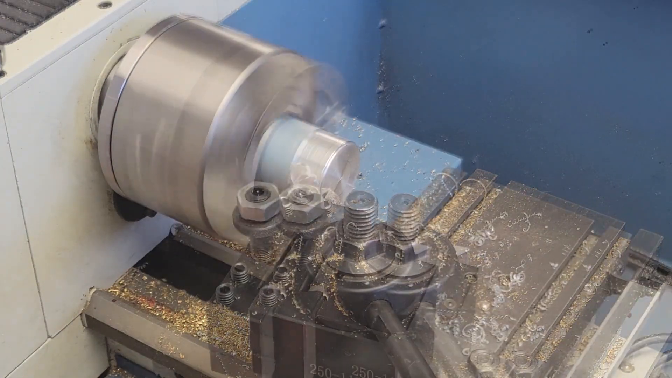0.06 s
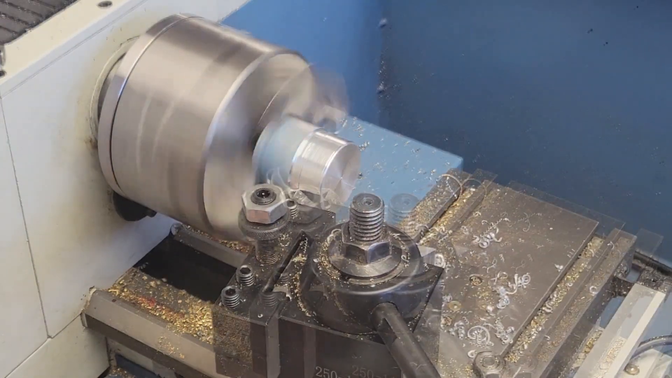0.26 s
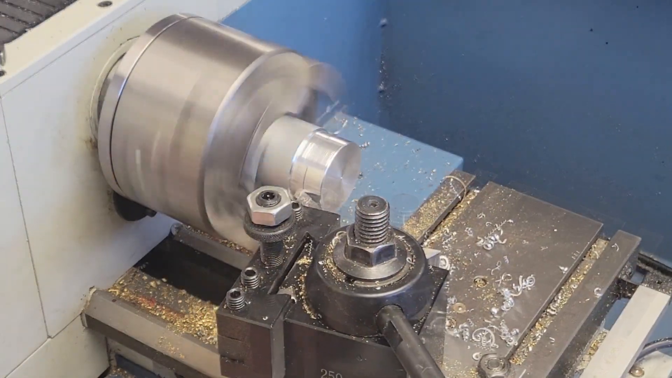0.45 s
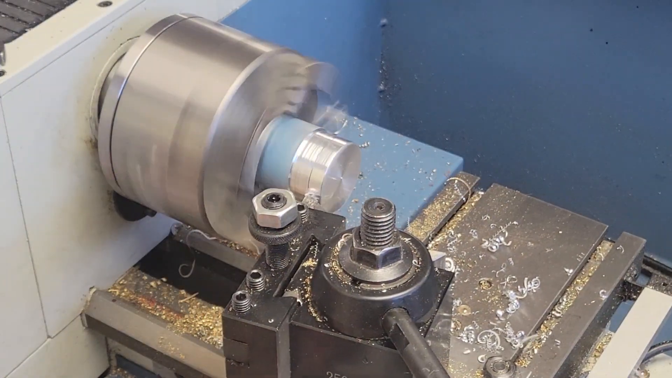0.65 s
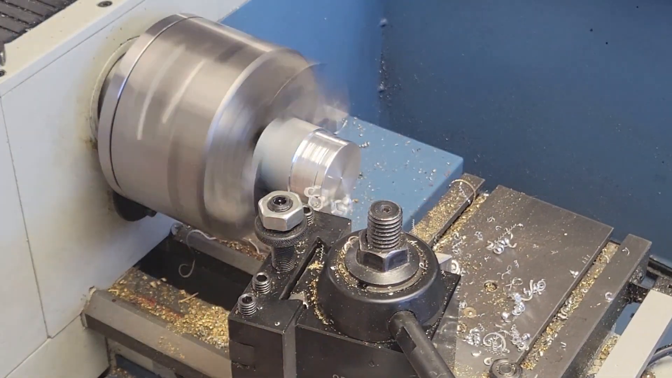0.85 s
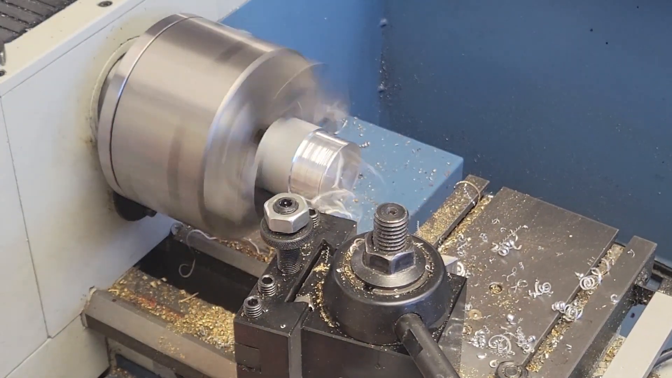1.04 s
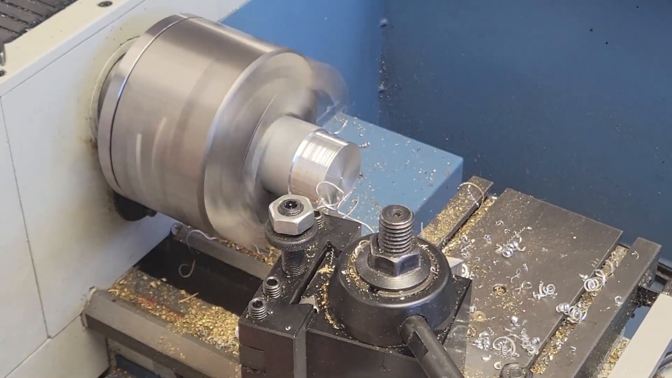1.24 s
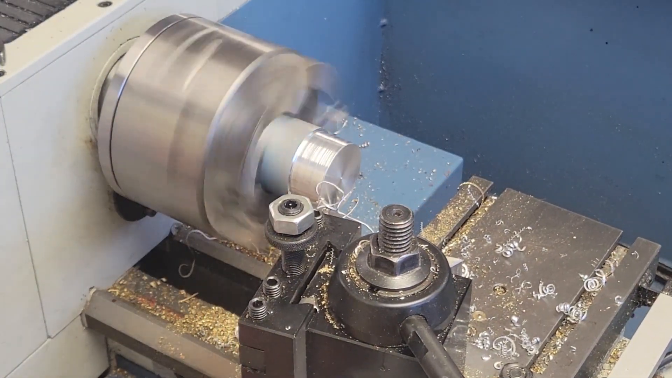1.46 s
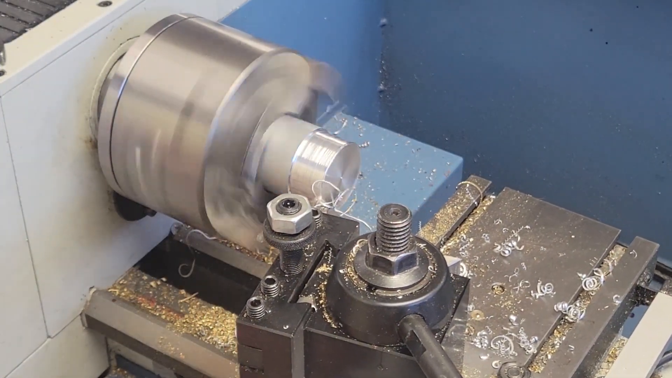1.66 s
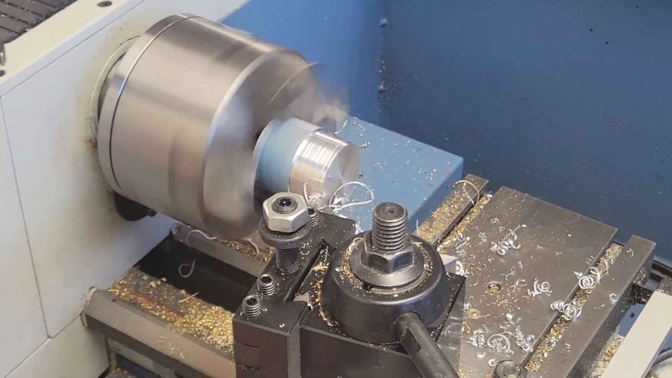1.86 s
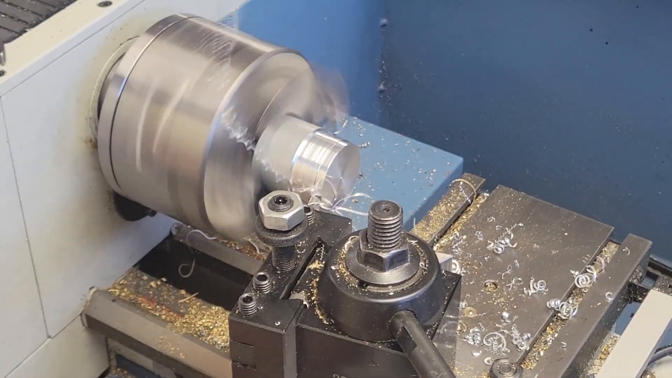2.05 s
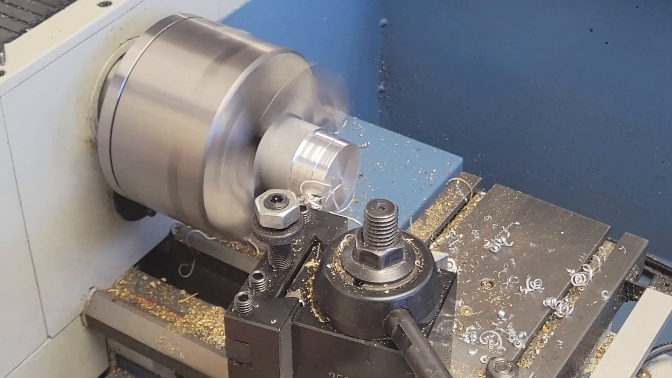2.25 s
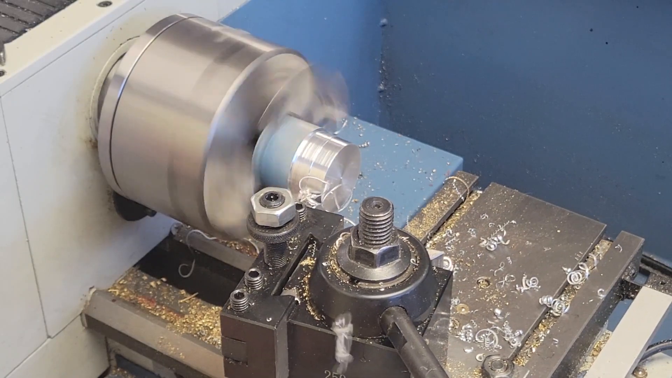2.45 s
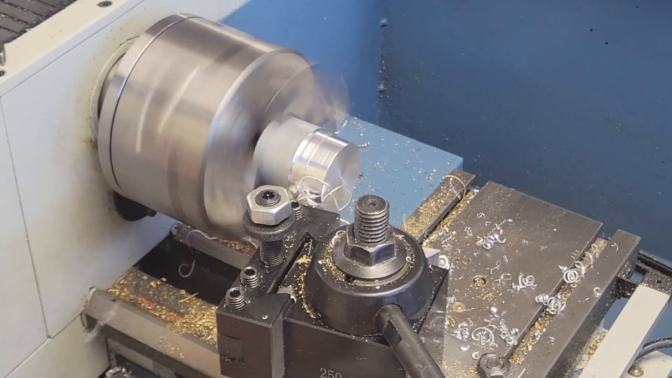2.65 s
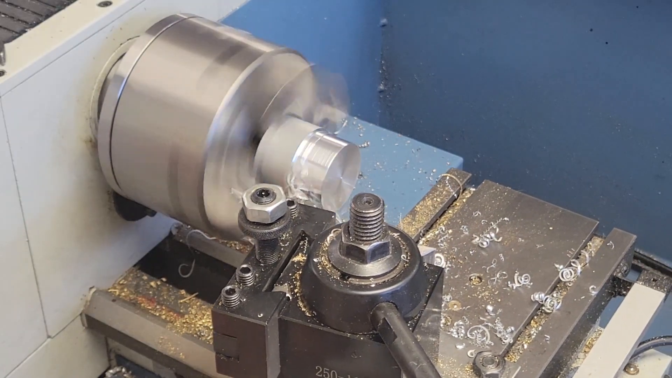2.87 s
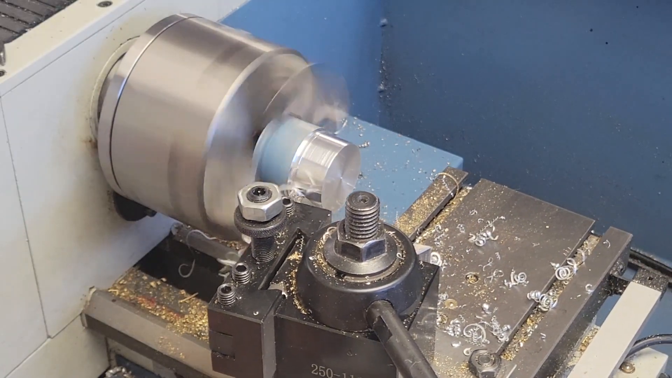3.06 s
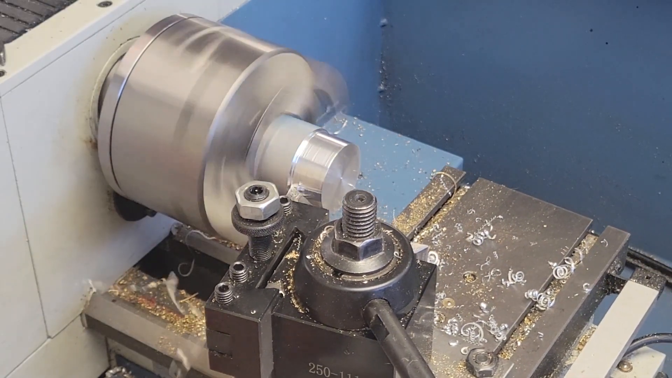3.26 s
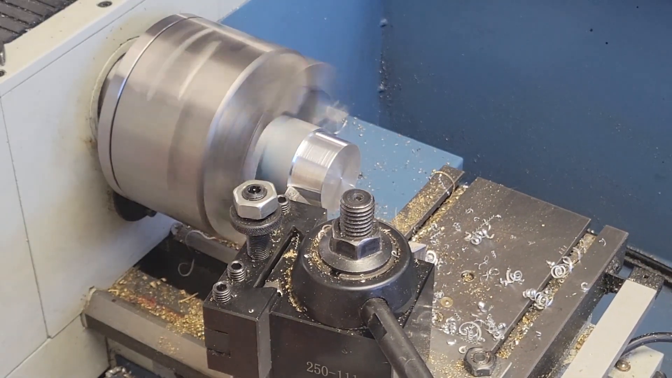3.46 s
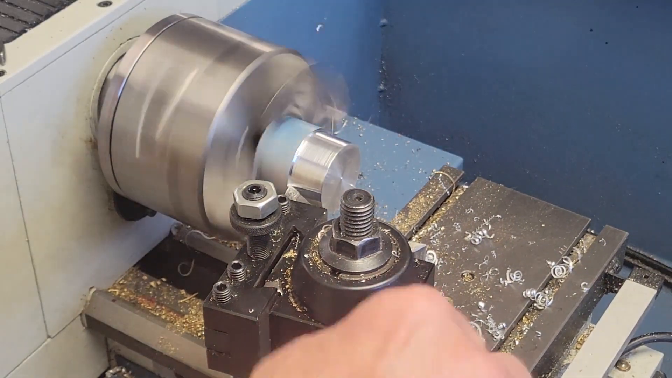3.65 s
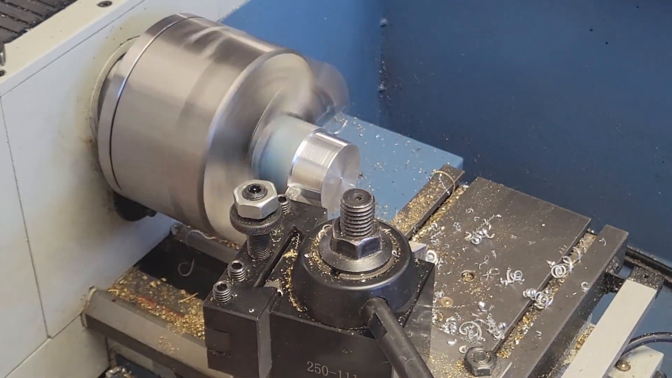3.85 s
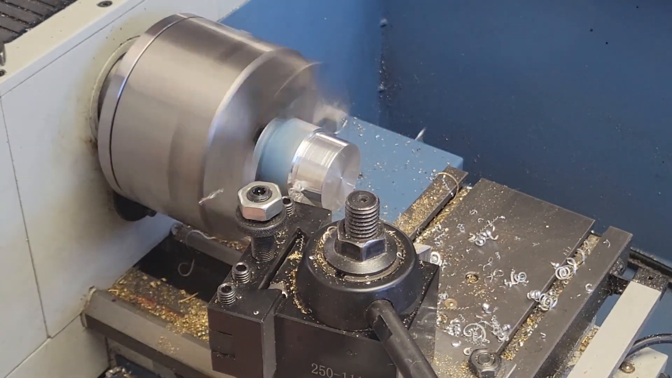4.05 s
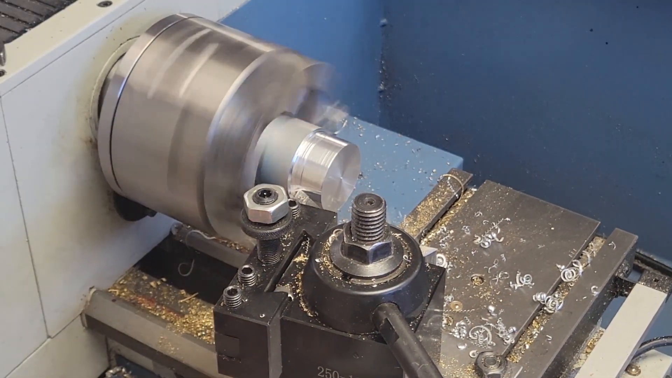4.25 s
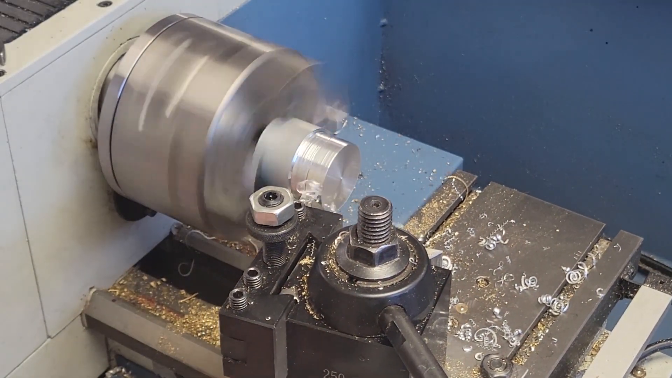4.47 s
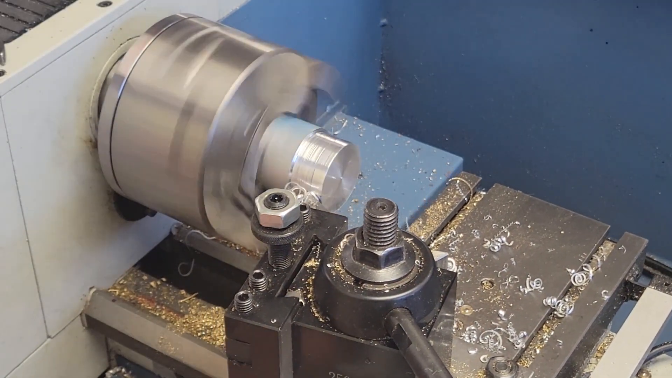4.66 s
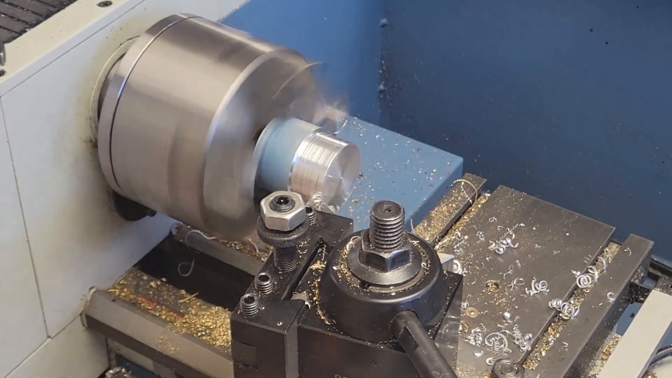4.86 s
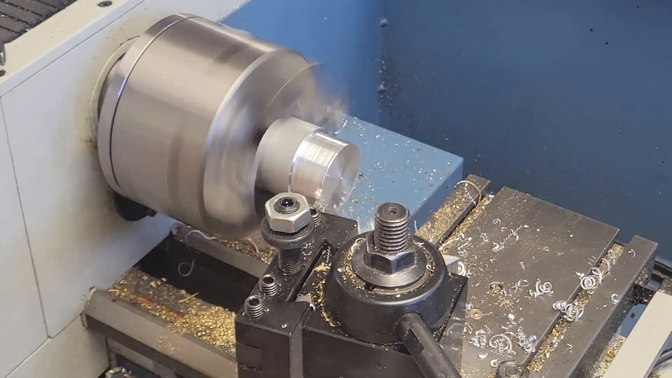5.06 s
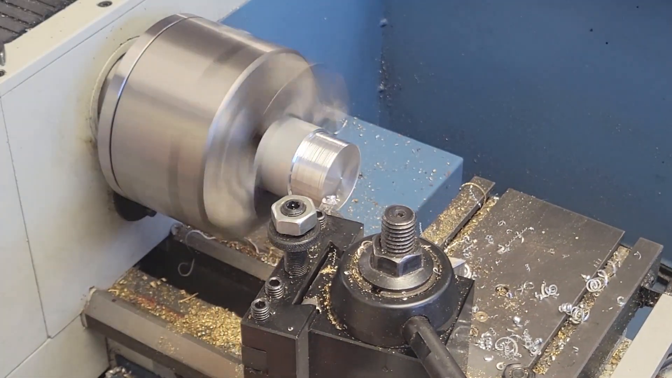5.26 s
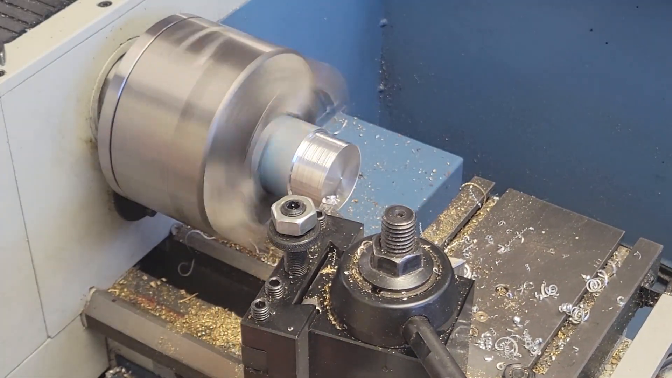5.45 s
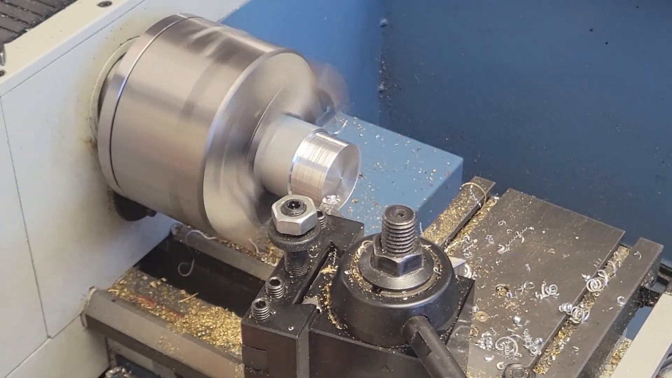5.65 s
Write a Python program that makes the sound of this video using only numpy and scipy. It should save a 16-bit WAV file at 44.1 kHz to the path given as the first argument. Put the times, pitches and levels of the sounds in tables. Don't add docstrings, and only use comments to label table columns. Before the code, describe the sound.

Close, gritty lathe cutting: wavering gear whine, fluttering bright chip hiss, rough knocking under load, and quick metallic ticking whenever the tool lets go.

```python
import sys
import numpy as np
from scipy import signal
from scipy.fft import rfft, irfft, next_fast_len
from scipy.io import wavfile

SR = 44100
rng = np.random.default_rng(int(sys.argv[2]) if len(sys.argv) > 2 else 0)


def magnitude_from_level(level_db):
    exponent = np.asarray(level_db, float) / 20
    return 10 ** exponent


def dump(signal):
    limited = np.clip(np.atleast_2d(signal).T, -1, 1)
    pcm = np.round(limited * 32767).astype(np.int16)
    wavfile.write(sys.argv[1], SR, pcm)


N = 251811
TIME_S = np.arange(N) / SR
TEETH = 32
SPINDLE_RATIO = 8
MEAN_LOAD_DB = -51.5


def rms_one(x):
    return x / np.sqrt(np.mean(x ** 2) + 1e-20)


def in_time(rows):
    s, *columns = np.transpose(rows)
    return [np.interp(TIME_S, s, column) for column in columns]


def at_hz(points, hz):
    table_hz, table_db = np.transpose(points)
    return np.interp(np.log(hz), np.log(table_hz), table_db)


def drift(rate):
    r = np.exp(-32 * np.pi * rate / SR)
    slow = signal.lfilter([1], [1, -2 * r, r * r], rng.standard_normal(N // 16 + 2002))
    slow = slow[2000:]
    return np.interp(np.arange(N) / 16, np.arange(len(slow)), rms_one(slow))


def bump(centre_s, width_s):
    return np.exp(-((TIME_S - centre_s) / width_s) ** 2 / 2)


def spell(start_s, end_s):
    return np.clip(np.minimum(TIME_S - start_s, end_s - TIME_S) / 0.008 + .5, 0, 1)


def resonance(hz, centre, width):
    return 1j * hz * width / (centre ** 2 - hz ** 2 + 1j * hz * width)


def casting(hz):
    # [f/Hz, width/Hz, lift/dB]
    ringing_modes = [(332.7, 34, 11.5), (465.6, 33, 10), (943, 37, 11), (1140, 22, 4.5), (1410, 50, 7),
                     (1623, 49, 7), (1772, 47, 8), (1970, 38, 5.5), (2622, 75, 5), (3806, 34, 10),
                     (4145, 69, 8.5), (4320, 29, 7.5), (4537, 46, 6), (4700, 100, 4.5), (5130, 40, 3.5),
                     (5420, 99, 2.5), (6000, 60, 1), (6215, 44, 8.5), (6740, 78, 9.5), (7440, 40, 6),
                     (7880, 64, 13), (8370, 130, 8), (8990, 55, 7), (10000, 330, 0.5), (10800, 30, -1),
                     (13200, 170, 6), (14200, 60, 8.5), (15080, 80, 7), (15420, 60, 8)]
    # [f/Hz, width/Hz, level/dB]
    cancelled = [(549, 34, -7), (2240, 230, -5), (3660, 110, 1), (4266, 55, -8.5), (4540, 40, -11.5),
                 (5050, 99, -11), (5296, 130, -6.5), (7640, 150, -2.5), (8010, 120, -14), (14500, 180, -4)]
    grid = np.arange(1, SR / 2, 4)
    gain = np.ones(len(grid), complex)
    for centre, width, db in [*ringing_modes, *cancelled]:
        gain = gain * (1 + (magnitude_from_level(db) - 1) * resonance(grid, centre, width))
    return np.interp(hz, grid, gain)


def placed(pair, response=lambda hz: 1, lift=lambda hz: 1):
    # [delay/s, level/dB]
    bench_echoes = [(.00022, 0), (.0009, -1.5), (.0021, -2.5), (.0034, -3)]
    # [f/Hz, level/dB]
    side_levels = [(60, -4), (110, -14), (200, -10), (380, -13.5), (700, -11.5), (1290, -16.5), (2380, -8),
                   (4400, -5.5), (8120, -3), (15000, -3)]
    # [f/Hz, level/dB]
    left_levels = [(60, 0), (200, -3), (480, -3.5), (1000, -1.5), (2000, -0.5), (4000, -3.5), (8000, -0.5),
                   (15000, -1)]
    echo_share, right_lag_s = .66, 1.2e-5
    size = next_fast_len(N + 4096)
    hz = np.maximum(np.arange(size // 2 + 1) * SR / size, 1)
    mid, diffuse = rfft(pair, size) * response(hz)
    mid = mid * lift(hz)
    echo = sum(magnitude_from_level(db) * np.exp(-2j * np.pi * hz * s) for s, db in bench_echoes)
    echo = mid * echo / (np.abs(echo) + 1e-9)
    side = echo_share * echo + np.sqrt(1 - echo_share ** 2) * diffuse
    side = side * magnitude_from_level(at_hz(side_levels, hz))
    lean = magnitude_from_level(at_hz(left_levels, hz) / 2) * np.exp(1j * np.pi * hz * right_lag_s)
    return irfft(np.array([(mid + side) * lean, (mid - side) / lean]), size)[:, :N]


def through_casting(force, spectrum):
    return rms_one(placed(force, lambda hz: magnitude_from_level(at_hz(spectrum, hz)), casting))


def gritty(per_s, spread_db, grit):
    hit = rng.random(N) < per_s / SR
    size = hit * magnitude_from_level(spread_db * np.minimum(rng.exponential(1, N), 4))
    burst = signal.lfilter([1], [1, -.985], size)
    return rng.standard_normal((2, N)) * (1 + grit * burst)


def throb(turns, motor_db, spindle_db, sharp):
    motor = np.exp(sharp * (np.cos(2 * np.pi * (turns - .15)) - 1))
    spindle = np.cos(2 * np.pi * (turns / SPINDLE_RATIO - .35))
    return magnitude_from_level(motor_db * motor + spindle_db * spindle)


def motor_state():
    # [t/s, f/Hz, level/dB]
    speed = [(0, 1293, -67), (.33, 1362, -62.5), (1.1, 1371, -57), (1.62, 1369, -70), (1.69, 1264, -62),
             (1.78, 1253, -56.5), (1.88, 1278, -53), (2.02, 1373, -56.5), (2.5, 1356, -55.5),
             (3.2, 1356, -58.5), (3.81, 1387, -55), (3.88, 1251, -57.5), (4.07, 1336, -58),
             (4.64, 1392, -59), (4.68, 1280, -54.5), (4.88, 1339, -57), (5.0, 1399, -67), (5.71, 1345, -57)]
    # [t/s, load level/dB, chip flow level/dB]
    cutting = [(0, -63, -58.5), (.33, -63, -57), (.45, -57, -53), (1.22, -57, -52), (1.46, -55, -50),
               (1.75, -52.5, -50), (2.3, -47.5, -49), (3.1, -49, -49.5), (3.3, -55.5, -53), (3.8, -54, -52),
               (3.9, -58.5, -54), (4.05, -59, -52), (4.45, -56, -52), (4.63, -58, -53.5), (4.8, -50, -52.5),
               (5.0, -57.5, -53), (5.3, -59, -53.5), (5.71, -61.5, -52.5)]
    # [from t/s, to t/s, top speed t/s, speed gain/Hz, whine change/dB]
    slack_spells = [
        (1.236, 1.457, 1.22, 110, -11),
        (3.292, 3.387, 3.3, 104.7, -3.5),
        (3.463, 3.845, 3.5, 80.2, -6.5),
        (5.208, 5.8, 5.26, 104.5, -8),
    ]
    # [t/s, knock/dB, roar/dB, sag/Hz]
    bites = [(0.277, 6.5, -1, 45.5), (0.539, 4, 3, 35), (.625, 0, 3.5, 0.5), (.75, -2, -1, 55),
             (.855, 0.5, -3, 35), (1.0, 2.5, -5, 24.5), (1.37, 4, -1, -0.5), (1.887, 11, 4, 15.5),
             (1.94, 4, -3, 0.5), (2.15, 7.5, -1, 39.5), (2.219, 6.5, -3, 24.5), (2.29, 8, -3, 43),
             (2.48, 7.5, -0.5, 10), (2.6, 6, 1.5, 30), (2.67, 6.5, 2, 5), (2.851, 2, 1.5, 5.5),
             (2.92, 4.5, 1.5, 24), (3.064, 7, -5, 30), (3.239, 3, 2.5, 2), (3.414, 11.5, 11, 44.5),
             (3.996, 3, 8, 35), (4.15, 7.5, 7.5, 9), (4.175, 3, -0.5, 49.5), (4.28, 4.5, 3, 5),
             (4.33, -3, -3.5, 35.5), (4.359, 7.5, 11, 5), (4.411, 8.5, 4.5, 41.5), (4.741, 5, -6, 10),
             (4.83, 4, -11, -2.5), (5.041, 2.5, 6, 50), (5.165, 0, 3, 20.5), (5.53, 12, 1, -1.5)]
    # [t/s, speed sag/Hz, whine swell/dB]
    wavers = [(.12, -2, 5), (.19, 20, 4.5), (.33, -16, 4), (.38, 16, 1), (.44, -10, 2), (.49, 30, -2),
              (.59, -35, 9), (.88, -9, 1), (.93, 17, 2), (.98, 5, -2), (1.14, -25, 3), (1.19, -15, 0),
              (1.73, -10, -1), (1.85, -10, 1.5), (1.98, -10, 3), (2.07, 22, .5), (2.15, 15, -5),
              (2.26, 15, -2), (2.33, -12, 1), (2.49, -9, 1.5), (2.63, -28, 2), (2.67, -4, 2.5),
              (2.72, -8, -3), (2.77, -22, 3), (3.08, 25, -3), (3.32, -23, 2), (3.37, 13, -1),
              (3.43, 25, -3), (3.85, 11, 0), (3.97, -4, -1), (4.03, -1, 4.5), (4.14, 35, -3),
              (4.21, -12, 1), (4.26, 28, 0.5), (4.42, 13, -1.5), (4.52, 11, 2.5), (4.6, 1, -1.5),
              (4.65, 25, -3), (4.72, -30, 4), (4.84, -13, 0), (4.95, 8, 3), (5.04, -10, 3.5)]
    # [from t/s, to t/s, knock/dB]
    lulls = [
        (1.501, 1.641, -2),
        (1.7, 1.865, -4),
    ]
    # [t/s, half length/s, level/dB]
    dropouts = [(.52, .012, -1), (.59, 0.011, -12), (0.823, 0.0074, -5), (1.115, .01, -16),
                (2.648, 0.016, -6), (2.757, .02, -5), (2.98, .012, 1), (3.128, 0.03, -3), (3.27, .01, -11),
                (3.33, .012, -2), (3.56, 0.035, -10), (3.72, .05, -1), (3.965, 0.012, -5),
                (4.37, 0.011, -2), (4.63, 0.024, 1.5)]
    race_rise_s, race_fall_hz_per_s = .08, 420
    sag_s, mesh_db_per_sag_hz, mean_flow_db = .021, 0.0928, -52.5
    tooth_hz, mesh = in_time(speed)
    load_db, flow_db = in_time(cutting)
    slack, race, knock, roar, sag = np.zeros((5, N))
    for start, end, fastest_s, gain_hz, fade_db in slack_spells:
        loose = spell(start, end)
        slack += loose
        mesh = mesh + fade_db * loose
        rise = gain_hz * (1 + (TIME_S - fastest_s) / race_rise_s)
        fall = gain_hz - race_fall_hz_per_s * (TIME_S - fastest_s)
        ending = np.clip((end - TIME_S) / race_rise_s, 0, 1)
        race += np.clip(np.minimum(rise, fall), 0, None) * ending
    for s, knock_db, roar_db, sag_hz in bites:
        late = TIME_S - s + 0.0078
        jolt = np.exp(-(late / np.where(late < 0, 0.0092, 0.026)) ** 2 / 2)
        knock += knock_db * jolt
        roar += roar_db * jolt
        sag += sag_hz * bump(s, sag_s)
    mesh = mesh + mesh_db_per_sag_hz * sag
    for s, sag_hz, swell_db in wavers:
        swing = bump(s, sag_s)
        sag += sag_hz * swing
        mesh = mesh + (swell_db + mesh_db_per_sag_hz * sag_hz) * swing
    for s, half_s, change_db in dropouts:
        mesh = mesh + change_db * bump(s, half_s)
    knock += MEAN_LOAD_DB - 9 + 0.86 * (load_db - MEAN_LOAD_DB) - 13.5 * slack
    for start, end, lull_db in lulls:
        knock += lull_db * spell(start, end)
    roar += load_db - 2 * slack
    air = mean_flow_db - 4.5 + 0.46 * (flow_db - mean_flow_db) - 2 * slack
    return tooth_hz + race - sag, mesh, knock, roar, flow_db, air


def whine(cycles, level_db, blur, flutter_db):
    gain = np.sqrt(2) * magnitude_from_level(level_db + flutter_db * drift(13.0))
    return gain * np.array([np.sin(2 * np.pi * cycles + blur * drift(25)) for ear in range(2)])


def gears(turns, tooth_hz, second_db, load_db):
    # [t/s, level/dB]
    feed = [
        (1.45, -112),
        (1.48, -63.5),
        (1.64, -62.5),
        (1.7, -66),
        (1.9, -67),
        (1.98, -60),
        (3.24, -60),
        (3.28, -87),
    ]
    # [multiple, level/dB]
    feed_lines = [(1, -10), (2, 2.5), (3, 2)]
    # [multiple, level below the second/dB]
    gear_upper = [(4, -21)]
    # [t/s, level below the second/dB]
    whistle = [(0, -16), (.2, -11), (.8, -9), (1.1, -15), (1.72, -7), (1.95, -11), (2.1, -17), (3.6, -16),
               (3.85, -10), (4.85, -9.5), (5.1, -13)]
    # [t/s, level/dB]
    idler = [
        (0, -87),
        (5.19, -89),
        (5.23, -74),
        (5.42, -67),
        (5.71, -60.5),
    ]
    feed_teeth, idler_teeth = 15, 42
    teeth_passed = TEETH * turns
    near = np.abs(resonance(tooth_hz, 1400, 170))
    first_db = -61.5 + .5 * np.minimum(load_db - MEAN_LOAD_DB, 0)
    out = near * whine(teeth_passed, first_db, blur=.15, flutter_db=1.2)
    out += whine(2 * teeth_passed, second_db + 1.5, blur=.2, flutter_db=.4)
    near = np.abs(resonance(3 * tooth_hz, 4140, 160)) ** 2
    out += near * whine(3 * teeth_passed, second_db - 11.5, blur=0.34, flutter_db=4.5)
    near = np.abs(resonance(3 * tooth_hz, 3770, 260)) ** 2
    out += near * whine(3 * teeth_passed, second_db - 5, blur=1.2, flutter_db=1.5)
    near = np.abs(resonance(8 * tooth_hz, 10400, 1100)) ** 2
    whistle_db = second_db + in_time(whistle)[0] + 3 * drift(40)
    out += near * whine(8 * teeth_passed, whistle_db, blur=2.6, flutter_db=1.5)
    out += whine(idler_teeth * turns, in_time(idler)[0], blur=0.24, flutter_db=1.0)
    engaged = (TIME_S > feed[0][0]) & (TIME_S < feed[-1][0])
    feed_db = np.where(engaged, in_time(feed)[0], -120)
    for multiple, level_db in feed_lines:
        out += whine(multiple * feed_teeth * turns, feed_db + level_db, blur=.2, flutter_db=1.5)
    upper = np.zeros((2, N))
    for multiple, level_db in gear_upper:
        upper += whine(multiple * teeth_passed, second_db + level_db, blur=0.67, flutter_db=6.0)
    return placed(out) + placed(upper, lift=casting)


def gear_knock():
    # [f/Hz, level/dB]
    knock_colour = [(71, -79), (120, -47), (395, -18), (460, -11.5), (637, -5), (695, -14), (931, -7),
                    (1040, -3.5), (1600, -1.5), (2080, -22.5), (3520, -120)]
    return through_casting(gritty(250, spread_db=2.5, grit=.6), knock_colour)


def casting_roar(beat):
    # [f/Hz, level/dB]
    roar_colour = [(650, -46), (1100, -8), (1870, 9.5), (2330, 3), (2660, -6.5), (2780, -20), (2930, -23.5),
                   (3300, -6.5), (4290, -50), (7260, -120)]
    return through_casting(gritty(300, spread_db=2, grit=.3) * beat ** .5, roar_colour)


def tool_hiss(beat):
    # [f/Hz, level/dB]
    tool_colour = [(1350, -36), (2300, -23), (2640, -4), (3190, -8), (3760, -3), (4660, -3.5), (5130, -6.5),
                   (6130, -6), (7800, -18), (10100, -75), (17200, -120)]
    return through_casting(gritty(200, spread_db=2, grit=.25) * beat, tool_colour)


def chip_hiss(beat):
    # [f/Hz, level/dB]
    air_colour = [(4240, -40), (7200, -7), (7560, -14.5), (8080, -2.5), (8620, -1.5), (9490, -5),
                  (10500, -6.5), (12000, -19.5), (15600, -67), (22000, -120)]
    return through_casting(gritty(300, spread_db=1.5, grit=.2) * beat, air_colour)


def highest_hiss(beat):
    # [f/Hz, level/dB]
    top_colour = [(6880, -31), (11700, -21), (12200, -4), (13700, -2.5), (14500, 0), (15700, -6)]
    return through_casting(gritty(300, spread_db=1.5, grit=.2) * beat ** .7, top_colour)


def rattles():
    # [t/s, peak level/dB, ring f/Hz]
    tooth_knocks = [(1.1583, -54, 4520), (1.1784, -50, 4400), (1.2146, -46, 4480), (1.2361, -42, 4650),
                    (1.258, -40, 4630), (1.28, -42, 4520), (1.3019, -42, 4480), (1.3236, -45, 4530),
                    (1.3452, -49, 4500), (1.3663, -50, 4630), (3.2615, -47, 4450), (3.5534, -48, 4380),
                    (5.1726, -50, 4535), (5.2064, -46, 4730), (5.229, -44, 4650), (5.249, -43, 4630),
                    (5.2709, -40.5, 4580), (5.2929, -46, 4340), (5.3134, -46, 4730), (5.333, -46, 4430),
                    (5.3574, -48, 4300), (5.3817, -50, 4876), (5.4001, -53, 4410), (5.4257, -46, 4410),
                    (5.45, -48, 4740), (5.496, -51, 4670), (5.5174, -44, 4730), (5.5773, -48, 4640)]
    rise_s, upper_hz, upper_db = 0.0014, 280, -10
    out = np.zeros((2, N + SR))
    t = np.arange(600) / SR
    shape = t / rise_s * np.exp(1 - t / rise_s)
    for s, db, hz in tooth_knocks:
        low_phase, high_phase = rng.uniform(0, 2 * np.pi, (2, 2, 1))
        ring = np.sin(2 * np.pi * hz * t + low_phase)
        ring = ring + magnitude_from_level(upper_db) * np.sin(2 * np.pi * (hz + upper_hz) * t + high_phase)
        start = int(s * SR)
        out[:, start:start + len(t)] += magnitude_from_level(db - 1) * shape * ring
    return placed(out[:, :N])


def scrapes_and_blows():
    # [t/s, level/dB, ring f/Hz, width/Hz, length/s]
    band_bursts = [(3.42, -63, 4330, 50, .25), (1.19, -62, 4350, 50, .12), (3.5, -67, 5760, 60, .14),
                   (3.46, -62, 2550, 60, .12), (3.595, -49.5, 2620, 280, .065),
                   (3.625, -54, 2350, 120, .035), (3.76, -51, 2200, 600, .065), (3.945, -53, 1430, 60, .055),
                   (3.94, -60, 2950, 150, .02), (3.97, -59, 2900, 150, .015), (4.13, -57, 2990, 150, .015),
                   (4.16, -54, 3020, 150, .018), (4.125, -56, 1500, 200, .045),
                   (4.685, -54, 3050, 150, .015), (1.68, -55, 1410, 80, .04), (.515, -60, 1850, 300, .04),
                   (1.62, -58, 3755, 80, .12), (1.74, -54, 3760, 60, .09), (1.84, -54, 3780, 60, .09),
                   (1.66, -57, 1390, 90, .2), (1.68, -55, 1775, 70, .24), (1.98, -58, 3700, 260, 1.25),
                   (3.235, -77, 260, 120, .025), (3.985, -53, 1700, 900, .012),
                   (4.145, -54, 1600, 700, .014), (5.03, -53, 1800, 800, .014), (4.27, -60, 3020, 120, .03),
                   (3.9, -65.5, 1388, 22.8, 0.55), (4.9, -68, 1405, 20, .3), (4.76, -64.5, 480, 24.7, 0.088),
                  (4.73, -63, 940, 59, 0.12), (3.06, -56, 1950, 43, .13), (2.0, -59, 1320, 100, 0.18),
                  (.4, -67.5, 4150, 50, 0.8), (4.3, -65, 4180, 66, 0.16), (2.3, -53, 1850, 100, .07),
                  (5.34, -72, 975, 67, .04), (5.52, -71.5, 990, 83, 0.039), (5.15, -68, 975, 60, 0.048),
                  (5.3, -62, 4400, 140, 0.28)]
    # [f/Hz, width/Hz, level/dB]
    opening_tones = [
        (796, 110, -73.5),
        (1054, 31, -69),
        (1603, 82, -65.5),
        (2450, 1300, -61),
        (2613, 120, -64.5),
    ]
    # [t/s, peak level/dB, low ring level/dB, upper ring level/dB]
    gear_blows = [(0.534, -45, -54, -57), (1.456, -57, -79, -62), (1.668, -49, -76, -61),
                  (1.695, -41, -68, -58), (1.8, -39, -66, -56), (1.872, -46, -55, -51),
                  (1.935, -39, -51.5, -61), (2.146, -43, -67, -45), (2.211, -43, -49, -58),
                  (2.275, -48, -50.5, -52), (2.346, -48, -68, -58), (2.467, -50, -58, -50),
                  (2.587, -49, -52, -46), (2.656, -48, -60, -53), (2.678, -47, -66, -46.5),
                  (2.784, -47, -55, -56), (2.826, -51, -72, -52), (2.9, -47, -59, -45),
                  (2.921, -47, -51.5, -58), (3.045, -46, -53.5, -52), (3.066, -44, -68, -65),
                  (3.239, -48, -57, -73), (3.397, -45, -56, -58), (3.989, -53, -64, -51.5),
                  (4.133, -56, -56.5, -56), (4.34, -52, -70, -59), (4.371, -51, -56, -63),
                  (4.459, -51, -64, -57.5), (4.68, -44, -68, -59), (4.725, -43, -79, -50.5),
                  (4.754, -40, -65, -55), (4.775, -44, -67, -62), (4.876, -46, -63, -52.5),
                  (5.027, -51, -63, -54), (5.136, -58, -65, -65)]
    # [t/s, level/dB]
    bench_thuds = [
        (.455, -76),
        (2.23, -80),
        (2.28, -83),
        (2.59, -79),
        (3.629, -88),
        (4.7, -92),
    ]
    bursts = band_bursts
    bursts += [(0, db, hz, width, 0.42) for hz, width, db in opening_tones]
    for s, peak_db, low_db, upper_db in gear_blows:
        bursts.append((s, low_db - 8, 462, 70, .02))
        bursts.append((s, upper_db - 7, 945, 110, .02))
        bursts.append((s, peak_db - 11, 1100, 1800, .006))
    bursts += [(s, db, 38, 45, .02) for s, db in bench_thuds]
    out = np.zeros((2, N))
    for s, level_db, hz, width, length in bursts:
        span = slice(int(s * SR), int((s + length + .04) * SR))
        t = TIME_S[span]
        fade = np.clip(1 - (t - s) / length, 0, 1) ** .3
        force = rng.standard_normal((2, len(t))) * fade
        r = np.exp(-np.pi * width / SR)
        for twice in range(2):
            force = signal.lfilter([1, 0, -1], [1, -2 * r * np.cos(2 * np.pi * hz / SR), r * r], force)
        loudness = np.sqrt(np.mean(force[0, :int(length * SR)] ** 2))
        out[:, span] += magnitude_from_level(level_db) * force / loudness
    return placed(out)


def bearing(turns):
    # [t/s, level/dB]
    tick_levels = [
        (0, -68),
        (.5, -72),
        (.6, -72),
        (1.12, -71),
        (1.2, -75),
        (1.6, -75),
        (3.2, -57),
        (3.3, -67),
        (5.71, -71),
    ]
    gate = np.exp(16.0 * (np.cos(2 * np.pi * (turns - .15)) - 1))
    force = rng.standard_normal((2, N)) * gate * magnitude_from_level(3.0 * drift(15.0))
    ring = placed(force, lambda hz: resonance(hz, 4480, 300) ** 2)
    return rms_one(ring) * magnitude_from_level(in_time(tick_levels)[0])


def feed_screw():
    # [t/s, f/Hz, level/dB]
    moan = [
        (3.44, 480, -91),
        (3.5, 478, -82),
        (3.8, 415, -82),
        (3.95, 385, -83),
        (4.0, 380, -98),
        (4.38, 460, -99),
        (4.42, 445, -76),
        (4.7, 385, -77),
        (4.75, 380, -95),
    ]
    pitch_hz, level_db = in_time(moan)
    return placed(whine(np.cumsum(pitch_hz) / SR, level_db, blur=.3, flutter_db=1.5))


def idle_rumble():
    # [f/Hz, level/dB]
    idle_colour = [(53, -74), (90, -30.5), (426, -26.5), (473, -16), (846, -32.5), (998, -22.5),
                   (1190, -52), (1410, -7), (1590, -31.5), (1730, -5.5), (2070, -26), (2480, 0.5),
                   (3200, -6), (4160, -34.5), (7040, -120)]
    return through_casting(rng.standard_normal((2, N)), idle_colour) * magnitude_from_level(-59)


def scene():
    tooth_hz, second_db, knock_db, roar_db, hiss_db, air_db = motor_state()
    tooth_hz = tooth_hz * (1 + .0005 * drift(14) + .003 * drift(45))
    turns = np.cumsum(tooth_hz) / SR / TEETH
    knock_db = knock_db + 0.7 * drift(24.0)
    roar_db = roar_db + 1.75 * drift(23.0)
    second_db = second_db + .3 * drift(10.0) + 1.1 * drift(35.0)
    surge_db = 1.04 * drift(1.4)
    hiss_db, air_db = hiss_db + surge_db, air_db + surge_db
    beat = throb(turns, motor_db=4.0, spindle_db=1.13, sharp=4.4)
    together = 0.5 * drift(46.0)
    load = gear_knock() * magnitude_from_level(knock_db + 3.0) + casting_roar(beat) * magnitude_from_level(roar_db - 2.0)
    bright = tool_hiss(beat) * magnitude_from_level(hiss_db - 0.77 + together)
    bright += chip_hiss(beat) * magnitude_from_level(air_db - 0.17 + together + 0.48 * drift(11.0))
    top_db = 0.63 * air_db - 25.5 + 1.0 * drift(20.0) + .5 * drift(5.0)
    bright += highest_hiss(beat) * magnitude_from_level(top_db)
    mix = gears(turns, tooth_hz, second_db, roar_db) + load + bright
    mix += rattles() + scrapes_and_blows() + bearing(turns)
    return mix + feed_screw() + idle_rumble()


def band_limit(x):
    return signal.sosfilt(signal.butter(12, 16280, fs=SR, output="sos"), x)


def record(dry):
    thin = signal.sosfilt(signal.butter(2, 150, "high", fs=SR, output="sos"), dry)
    mix = signal.sosfilt(signal.ellip(12, .5, 70, 15735, fs=SR, output="sos"), thin)
    return band_limit(mix)


dry = scene()
out = record(dry)
dump(out)
```